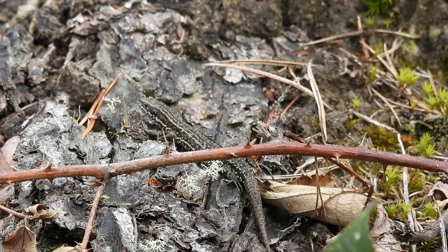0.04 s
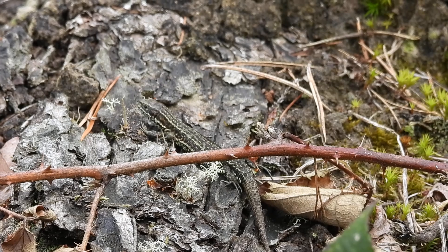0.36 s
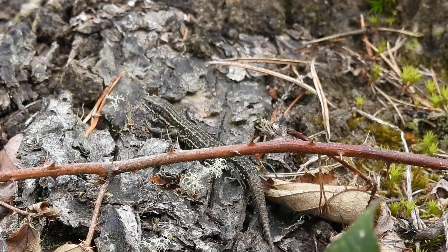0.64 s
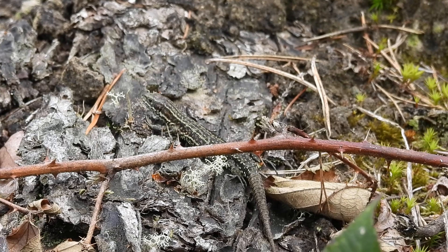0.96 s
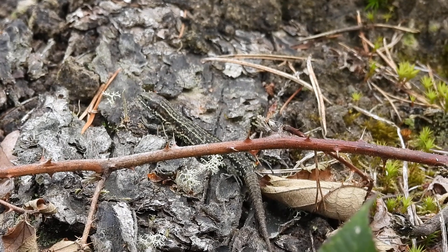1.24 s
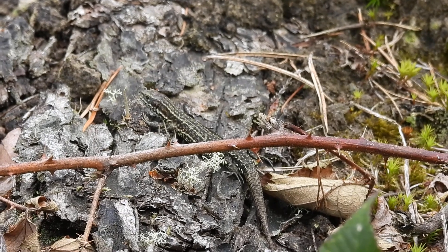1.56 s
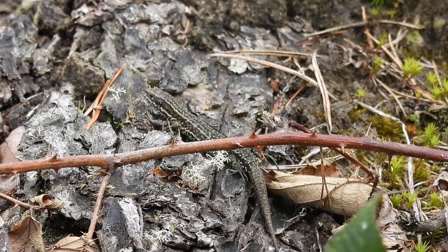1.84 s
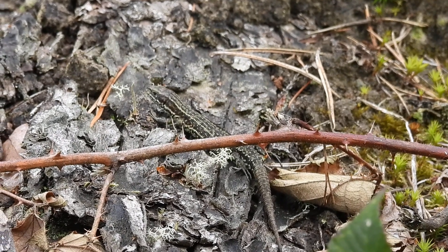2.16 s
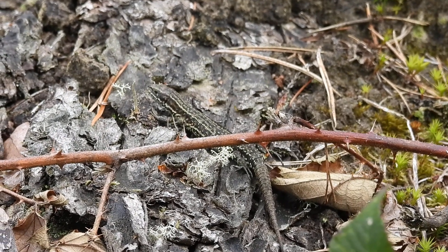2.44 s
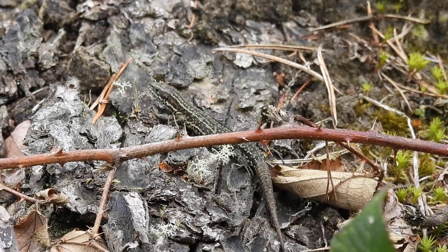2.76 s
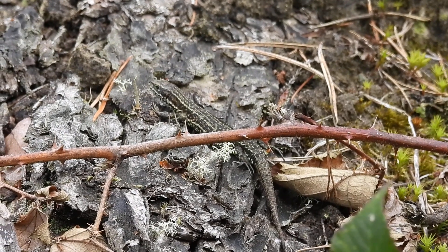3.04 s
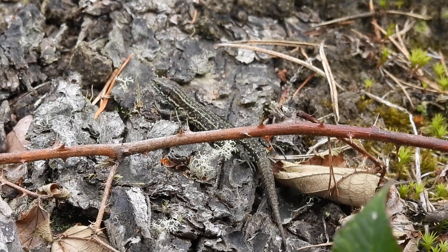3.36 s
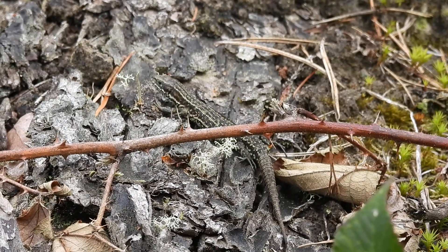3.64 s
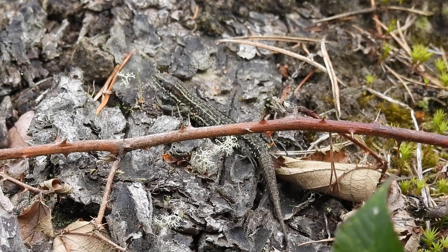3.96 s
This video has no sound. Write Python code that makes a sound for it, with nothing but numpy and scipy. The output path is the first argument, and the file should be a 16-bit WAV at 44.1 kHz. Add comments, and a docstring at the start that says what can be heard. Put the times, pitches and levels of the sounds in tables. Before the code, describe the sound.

A steady faraway road rush, with soft wind in trees and a bird's quick whistled song.

```python
"""Quiet woodland: distant traffic rushes steadily, with a few faint whines, under a soft
hiss of wind in the trees. A small bird sings one rapid phrase of whistled slurs, gliding
pure tones that echo among the trunks; a farther bird follows faintly. The sound fades in
just after the start, bass last, through a microphone with a rippled treble."""
import sys
import numpy as np
from scipy import signal
from scipy.fft import rfft, irfft, next_fast_len
from scipy.io import wavfile
from scipy.ndimage import uniform_filter1d, map_coordinates

SR = 44100
rng = np.random.default_rng(int(sys.argv[2]) if len(sys.argv) > 2 else 0)


def generate_wav(sig):
    """Save sig (samples, or channels by samples) to the path in sys.argv[1] as 16-bit PCM at SR."""
    pcm = np.round(np.clip(np.atleast_2d(sig).T, -1, 1) * 32767).astype(np.int16)
    wavfile.write(sys.argv[1], SR, pcm)


N = 176400
SIDES = np.array([[.5], [-.5]])  # splits a left-minus-right difference between the ears


def amp(db):
    """Decibels to gain."""
    return 10 ** (np.asarray(db) / 20)


def unit(x):
    """Scale to rms 1."""
    return x / np.sqrt(np.mean(x ** 2) + 1e-20)


def along(points, hz):
    """Interpolate (f/Hz, value) points on a log axis."""
    f, v = np.transpose(points)
    return np.interp(np.log(hz + 1), np.log(f + 1), v)


def curve(rows):
    """Interpolate (t/s, value) points per sample."""
    return np.interp(np.arange(N) / SR, *np.transpose(rows))


def wobble(knots_per_s):
    """Smooth random curve."""
    position = np.arange(N) * knots_per_s / SR + 2
    return map_coordinates(rng.standard_normal(4096), [position], mode="mirror")


def filtered(x, response):
    """Apply a complex frequency response."""
    m = next_fast_len(N + SR // 2)
    return irfft(rfft(x, m) * response(np.fft.rfftfreq(m, 1 / SR)), m)[..., :N]


def rush(spectrum, coherence, pan, patchy_db):
    """Stereo noise, rms 1, with small time-frequency patches of random gain."""
    bins = signal.stft(rng.standard_normal((2, N)), nperseg=1024)[2]
    patches = uniform_filter1d(rng.standard_normal(bins.shape[1:]), size=3, axis=0)
    patches = uniform_filter1d(patches, size=5, axis=1)
    pair = signal.istft(bins * amp(patchy_db * unit(patches)), nperseg=1024)[1][:, :N]

    def mid_side(hz):
        angle = np.arccos(np.clip(along(coherence, hz), -1, 1)) / 2
        return amp(along(spectrum, hz)) * [np.cos(angle), np.sin(angle)]

    mid, side = filtered(pair, mid_side)
    ears = np.array([mid + side, mid - side])
    return unit(filtered(ears, lambda hz: amp(along(pan, hz) * SIDES)))


def slurs(notes, edge_share=0.13, flutter_db=1.3, knots_per_s=258.2):
    """Pure tones arching through three pitches, wavering slightly in pitch and level."""
    out = np.zeros(N)
    waver = 1 + 0.005 * wobble(knots_per_s)
    flutter = amp(flutter_db * wobble(knots_per_s))
    for start_s, length_s, *pitches_hz, db in notes:
        i = np.arange(max(round(start_s * SR), 0), min(round((start_s + length_s) * SR), N))
        progress = np.linspace(0, 1, len(i))
        hz = np.polyval(np.polyfit([0, .5, 1], pitches_hz, 2), progress) * waver[i]
        ramp = np.clip(np.minimum(progress, 1 - progress) / edge_share, 0, 1)
        tone = np.sqrt(2) * np.sin(2 * np.pi * np.cumsum(hz) / SR)
        out[i] += amp(db) * np.sin(np.pi / 2 * ramp) * flutter[i] * tone
    return out


# Road envelope: t/s, level/dB
ROAD_LEVEL_DB = [(.2, -46.5), (.8, -46.5), (1.4, -45.5), (1.8, -46.5), (2.3, -45.5), (3.2, -46),
                 (3.95, -46)]
# Road spectrum: f/Hz, relative density/dB
ROAD_SPECTRUM_DB = [(30, -61), (70, -41.5), (120, -33.5), (160, -24), (210, -12), (310, -6.5), (410, -3),
                    (540, -4.5), (700, -1.5), (850, 1), (1000, -1), (1300, -2), (1650, -10), (2400, -17),
                    (4000, -21), (8000, -50)]
# Road stereo likeness: f/Hz, coherence/1
ROAD_COHERENCE = [(60, 0.72), (250, 0.91), (700, 0.84), (1200, 0.84), (2500, 0.37)]
# Road balance: f/Hz, L-R/dB
ROAD_PAN_DB = [(140, 0), (250, -1.5), (500, 0.5), (750, -2), (1100, -4.5), (1600, -2.5), (2300, 0)]
# Whines and drones: t/s, length/s, start f/Hz, middle f/Hz, end f/Hz, level/dB
ROAD_WHINES = [(.09, 0.093, 1468, 1424, 1390, -52), (1.17, 0.27, 1130, 1294, 1373, -56),
               (1.33, .25, 1380, 1450, 1367, -52.5), (2.75, 0.83, 288.4, 320.3, 338, -57.5)]


def traffic(left_lag_s=.00002, whine_width_hz=55):
    """A far road's mottled rush, slightly right, with a few noise-blurred tones."""
    road = amp(curve(ROAD_LEVEL_DB)) * rush(ROAD_SPECTRUM_DB, ROAD_COHERENCE, ROAD_PAN_DB, patchy_db=2.0)
    whines = slurs(ROAD_WHINES) * unit(wobble(2 * whine_width_hz))
    return filtered(road + whines, lambda hz: np.exp(-2j * np.pi * hz * left_lag_s * SIDES))


# Breeze envelope: t/s, level/dB
BREEZE_DB = [(.1, -58), (.8, -56), (2.0, -57), (3.0, -55), (3.95, -55.5)]
# Leaf spectrum: f/Hz, relative density/dB
LEAF_SPECTRUM_DB = [(200, -31), (1500, -5.5), (2600, -7.5), (3300, -2.5), (4400, -.5), (5500, -1.5),
                    (6400, -4.5), (7500, -5.5), (8500, -12.5), (10300, -17), (12000, -27), (13300, -49)]
# Leaf stereo likeness: f/Hz, coherence/1
LEAF_COHERENCE = [(2000, 0.78), (3500, 0.9), (4600, 0.55), (7000, 0.15), (12000, .25)]
# Leaf balance: f/Hz, L-R/dB
LEAF_PAN_DB = [(2000, 0), (2900, 7.5), (3600, 0.5), (5700, 1.5), (8200, 1), (9700, -2.5), (12500, -3)]
# Leaf phase: f/Hz, left lead/rad
LEAF_LEAD_RAD = [(1500, 0.078), (3200, 0), (4200, 0.69), (5200, 1.67), (6300, 2.1), (9500, 1.6)]


def leaves():
    """Air hissing through the treetops, slowly freshening."""
    hiss = amp(curve(BREEZE_DB)) * rush(LEAF_SPECTRUM_DB, LEAF_COHERENCE, LEAF_PAN_DB, patchy_db=1.47)
    return filtered(hiss, lambda hz: np.exp(1j * along(LEAF_LEAD_RAD, hz) * SIDES))


# Near bird's phrase: t/s, length/s, start f/Hz, middle f/Hz, end f/Hz, relative level/dB
NEAR_NOTES = [(.030, 0.041, 4170, 4300, 4370, -46), (.114, .029, 5730, 6050, 5140, -45.5),
              (.150, .062, 4030, 4250, 4270, -46), (.279, 0.019, 3830, 3140, 2760, -47.5),
              (.306, .014, 2790, 3780, 3950, -50), (.322, 0.013, 3730, 4470, 4420, -46.5),
              (.333, 0.031, 4800, 5040, 4860, -53), (.336, .034, 4400, 4380, 4460, -48),
              (.361, .015, 5500, 5840, 5500, -48.5), (.421, 0.024, 3610, 3380, 2600, -50),
              (.452, .011, 2750, 3700, 3950, -49), (.466, .012, 3520, 4300, 4730, -45),
              (.477, 0.034, 4560, 4250, 4950, -43.5), (.512, .009, 5230, 5720, 6010, -47),
              (.518, 0.034, 5140, 4940, 4250, -47.5), (.581, 0.024, 3800, 3170, 2760, -46),
              (.610, .009, 3220, 3550, 4260, -46), (.624, 0.0071, 3400, 4130, 4650, -51),
              (.640, 0.029, 4190, 4380, 4310, -45), (.669, 0.011, 5600, 5800, 5700, -47),
              (.683, .045, 4770, 5090, 4730, -51.5), (.737, 0.027, 3700, 3134, 2860, -46),
              (.777, .009, 2950, 3640, 3980, -54), (.791, .010, 3680, 4090, 4230, -44.5),
              (.799, 0.021, 4320, 4120, 4500, -41), (.832, .020, 5270, 5480, 5500, -58),
              (.863, 0.035, 4120, 4940, 4900, -52), (.889, .016, 3850, 3510, 2980, -47),
              (.905, .012, 4970, 4440, 4030, -49), (.920, .008, 5650, 5430, 5000, -53),
              (.922, .009, 3170, 3630, 4100, -52), (.948, 0.023, 4310, 4266, 4450, -49),
              (.977, .013, 5620, 5620, 5560, -56.5), (1.000, .036, 4180, 4315, 4190, -50),
              (1.046, .022, 4150, 3290, 3000, -47.5), (1.050, 0.049, 4470, 4940, 4400, -46.5),
              (1.115, 0.048, 3046, 3314, 2940, -49.5), (1.265, 0.025, 3850, 3200, 2990, -50),
              (1.331, 0.033, 2880, 3273, 2800, -49.5), (1.640, .04, 3250, 3180, 3050, -56.5)]
# Far bird's phrase: same columns
FAR_NOTES = [(2.02, 0.056, 4750, 4650, 4640, -64), (2.075, .10, 3980, 3550, 3370, -60),
             (2.20, .045, 2960, 2890, 2900, -59), (2.33, 0.03, 3360, 3400, 3330, -60.5),
             (2.43, 0.036, 3360, 3460, 3560, -61), (2.55, 0.041, 3590, 3300, 3200, -63.5),
             (2.65, 0.047, 3410, 3280, 3390, -60.5), (2.82, 0.079, 3300, 3400, 3380, -61.5)]
# Both voices, weaker at low pitch: f/Hz, gain/dB
VOICE_DB = [(2600, -7), (3000, -3.5), (3300, 0)]
# Near bird's balance: f/Hz, L-R/dB
NEAR_PAN_DB = [(3000, 3.5), (3700, 4), (4300, -2), (5000, 5.5), (6000, 0)]
# Near bird's phase: f/Hz, left lead/rad
NEAR_LEAD_RAD = [(3000, -0.0016), (3700, 0.16), (4250, 1.25), (4600, 1.5), (4850, -1.5), (5150, -1.2),
                 (5600, 1.9)]
# Echo colour: f/Hz, gain/dB
ECHO_COLOUR_DB = [(3000, 0), (3800, -2), (4400, .7), (4900, -2.5), (6000, -2)]


def birds(near_db=-3, far_db=-2.2, early_db=-8.5, near_echo_db=-3, far_echo_db=-7):
    """Two whistling birds, the near one slightly left, the far one centred; both echo."""
    songs = np.array([slurs(NEAR_NOTES), slurs(FAR_NOTES)])
    near, far = filtered(songs, lambda hz: amp(along(VOICE_DB, hz)))
    ear_gain = lambda hz: amp(near_db + along(NEAR_PAN_DB, hz) * SIDES)
    ear_phase = lambda hz: np.exp(1j * along(NEAR_LEAD_RAD, hz) * SIDES)
    direct = filtered(near, lambda hz: ear_gain(hz) * ear_phase(hz)) + amp(far_db) * far
    early = amp(early_db) * first_reflections(near)
    late = trunk_echoes(amp(near_echo_db) * near + amp(far_echo_db) * far)
    return direct + filtered(early + late, lambda hz: amp(along(ECHO_COLOUR_DB, hz)))


def first_reflections(x, count=12, min_delay_s=.002, max_delay_s=0.035):
    """Bounces off the ground and closest trunks, different at each ear."""
    taps = rng.standard_normal((2, count))
    delays_s = rng.uniform(min_delay_s, max_delay_s, (2, count))
    ears = []
    for gains, times in zip(taps, delays_s):
        bounces = sum(gain * np.pad(x, (int(s * SR), 0))[:N] for gain, s in zip(gains, times))
        ears.append(bounces / np.linalg.norm(gains))
    return np.array(ears)


# Woodland decay: f/Hz, T60/s
TRUNK_T60_S = [(2500, 0.93), (4250, 1.0), (5200, 0.97), (6500, 0.76)]


def trunk_echoes(x):
    """Scatter among the trunks: a decaying noise tail per ear."""
    hz, t, bins = signal.stft(rng.standard_normal((2, SR)), SR, nperseg=256)
    decay = 1000. ** (-t / along(TRUNK_T60_S, hz)[:, None])
    tail = signal.istft(bins * decay, SR, nperseg=256)[1]
    return signal.fftconvolve(x[None], tail / np.linalg.norm(tail[0]), axes=1)[:, :N]


def scene():
    """Road, treetops and birds together."""
    return traffic() + leaves() + birds()


# Microphone treble ripple: f/Hz, depth/1
RIPPLE_DEPTH = [(3100, 0.06), (3500, 0.48), (3750, 0.44), (3930, 0.6), (4020, 0.2), (4100, 0.07)]
# Extra bass fade-in: t/s, gain/dB
BASS_FADE_DB = [(.1, -11), (.45, -14), (.7, -1)]
# Overall fade-in: t/s, gain/dB
FADE_IN_DB = [(.08, -41), (.101, -24), (.11, -4.5), (.3, -3), (.55, -1)]


def record(dry, notch_hz=3923, notch_step_hz=99, bass_edge_hz=260, top_hz=13400):
    """Microphone: a comb of treble notches, a fade-in with the bass last, a band limit."""
    comb = lambda hz: np.exp(-2j * np.pi * (hz - notch_hz) / notch_step_hz)
    rippled = filtered(dry, lambda hz: 1 - along(RIPPLE_DEPTH, hz) * comb(hz))
    bass = filtered(dry, lambda hz: np.exp(-(hz / bass_edge_hz) ** 4))
    heard = rippled + (amp(curve(BASS_FADE_DB)) - 1) * bass
    gate = np.arange(N) / SR > FADE_IN_DB[0][0]
    fade = amp(curve(FADE_IN_DB)) * gate
    return filtered(fade * heard, lambda hz: hz < top_hz)


dry = scene()
out = record(dry)
generate_wav(out)
```